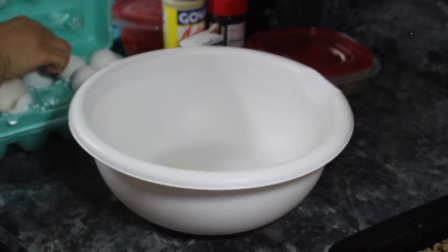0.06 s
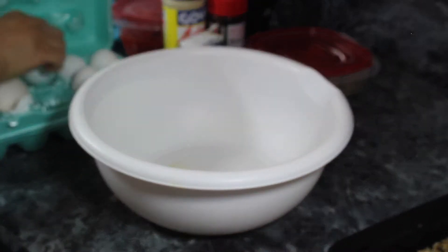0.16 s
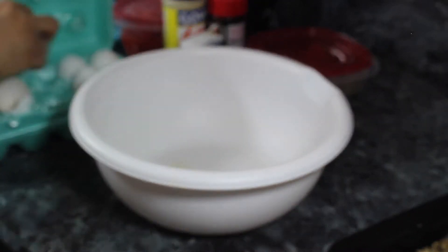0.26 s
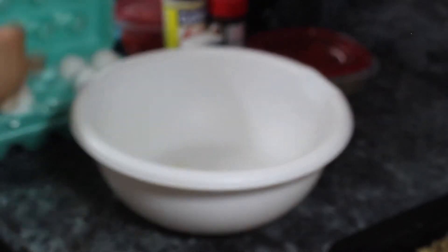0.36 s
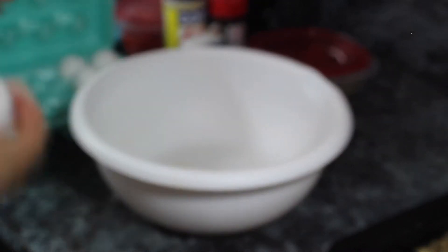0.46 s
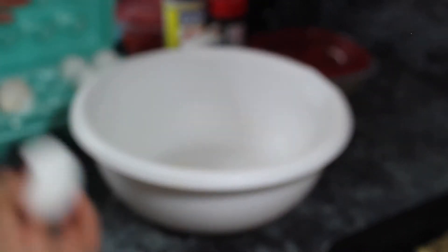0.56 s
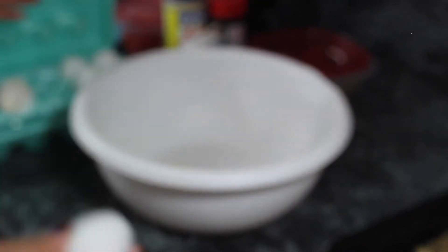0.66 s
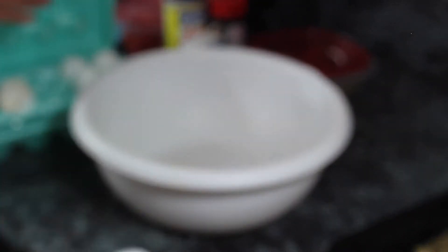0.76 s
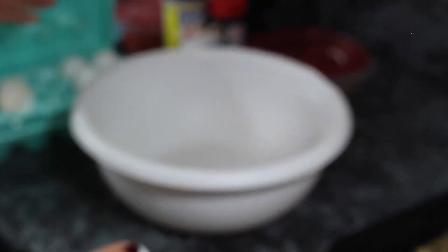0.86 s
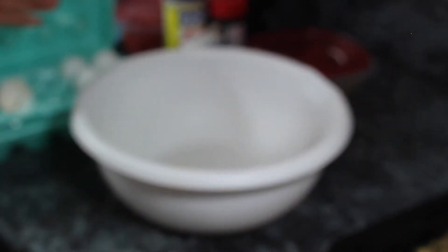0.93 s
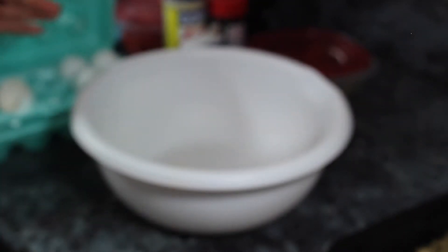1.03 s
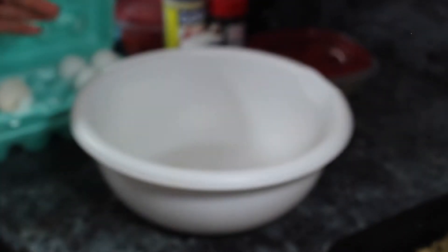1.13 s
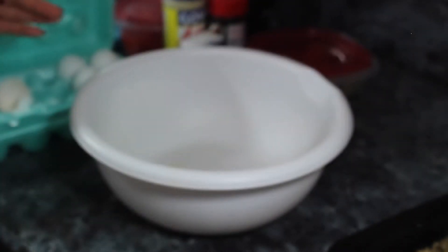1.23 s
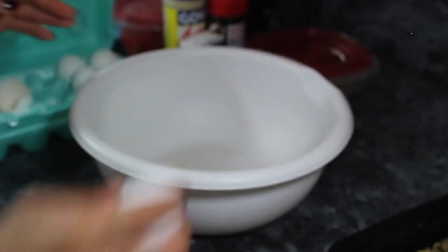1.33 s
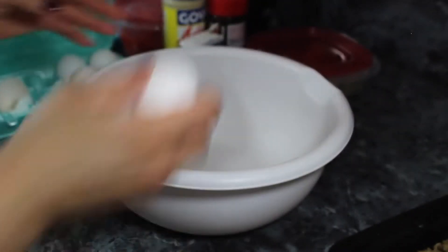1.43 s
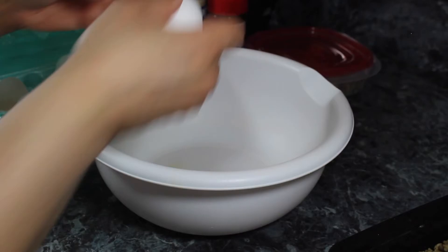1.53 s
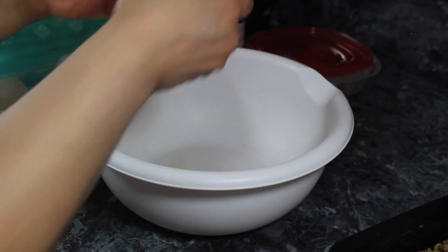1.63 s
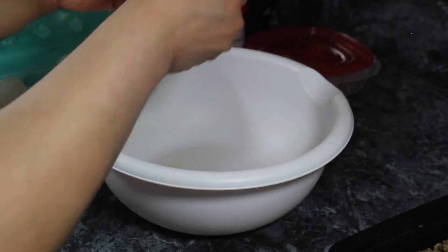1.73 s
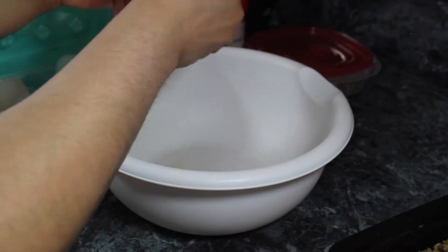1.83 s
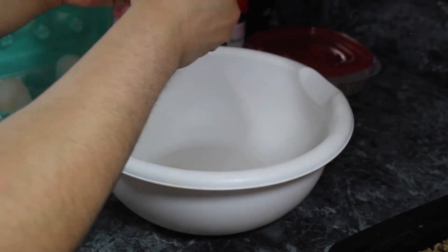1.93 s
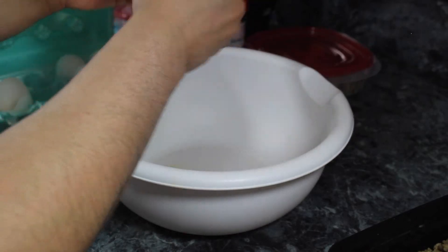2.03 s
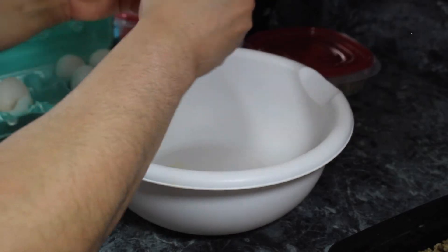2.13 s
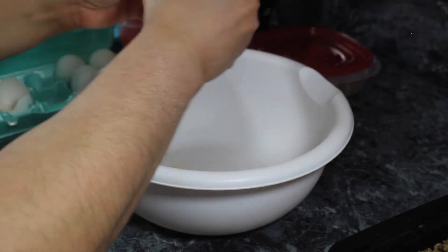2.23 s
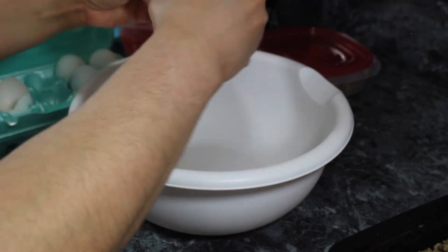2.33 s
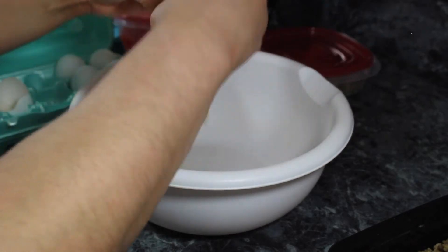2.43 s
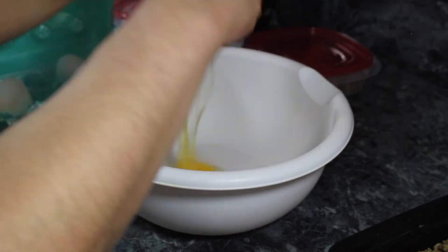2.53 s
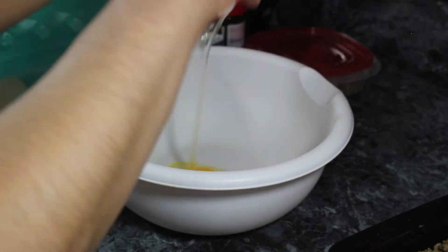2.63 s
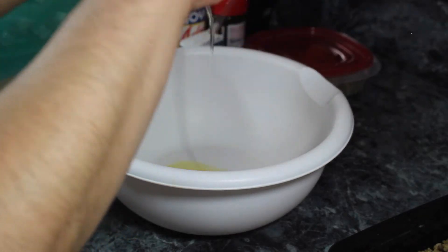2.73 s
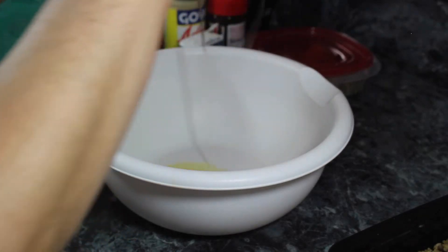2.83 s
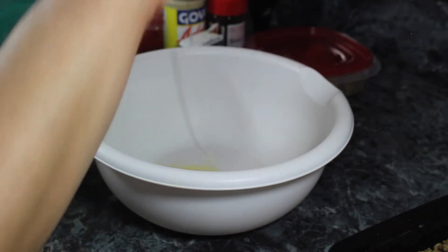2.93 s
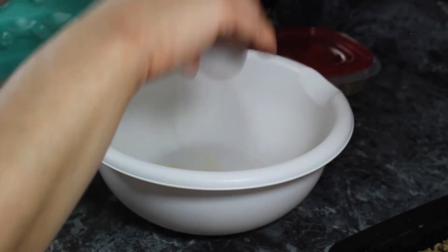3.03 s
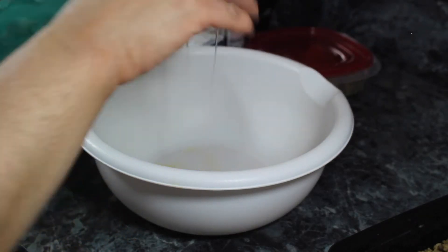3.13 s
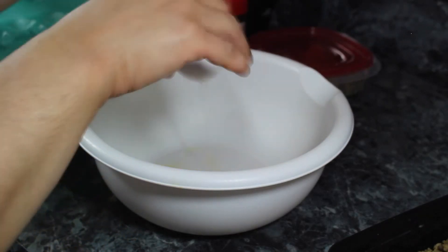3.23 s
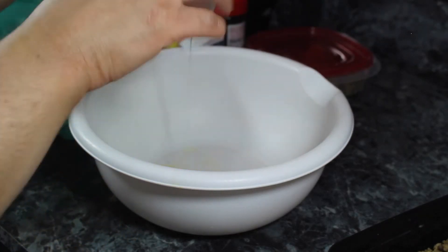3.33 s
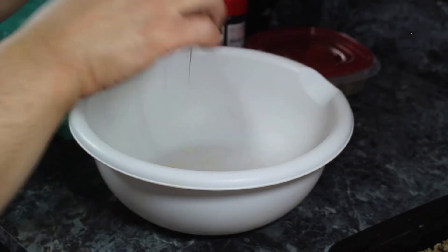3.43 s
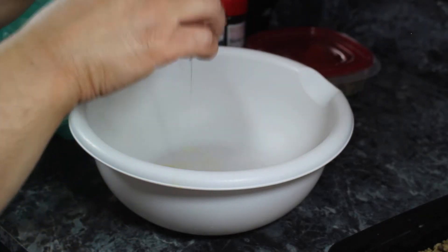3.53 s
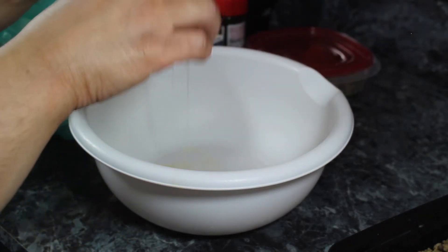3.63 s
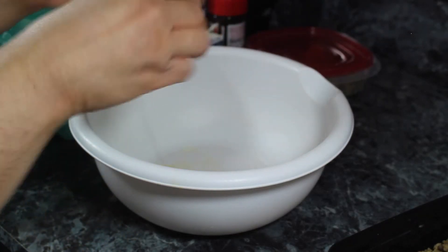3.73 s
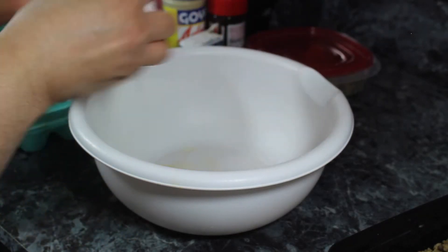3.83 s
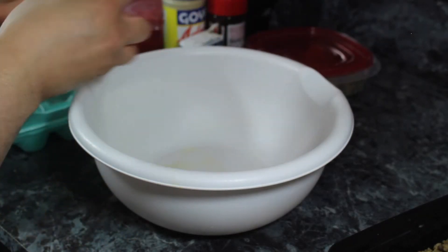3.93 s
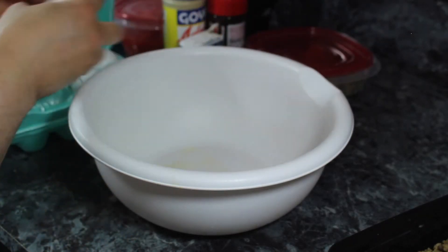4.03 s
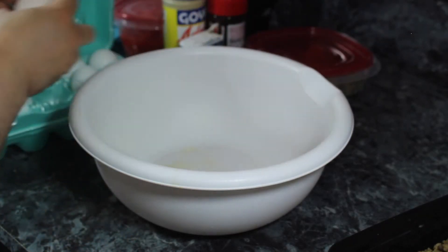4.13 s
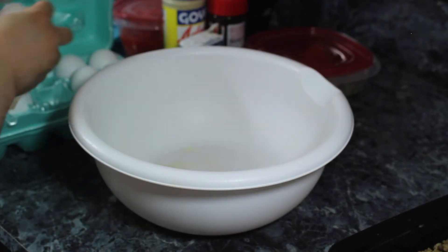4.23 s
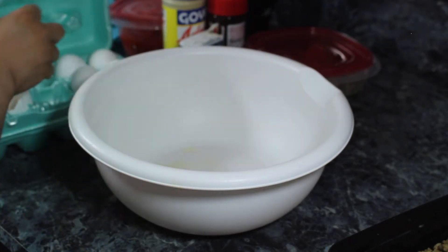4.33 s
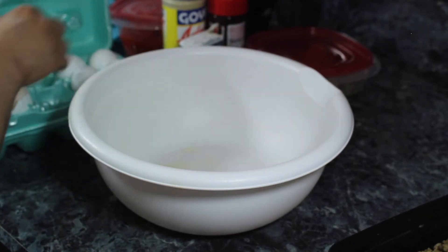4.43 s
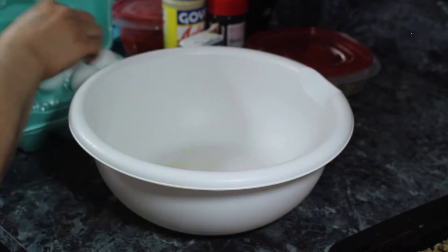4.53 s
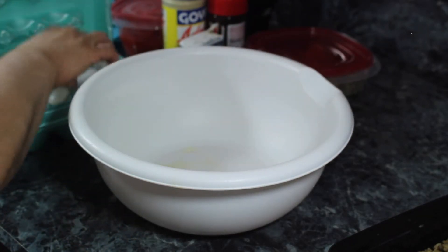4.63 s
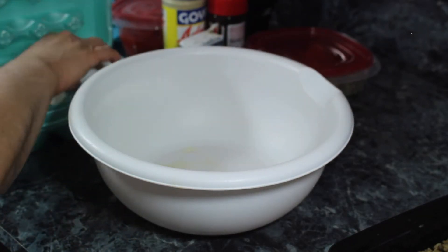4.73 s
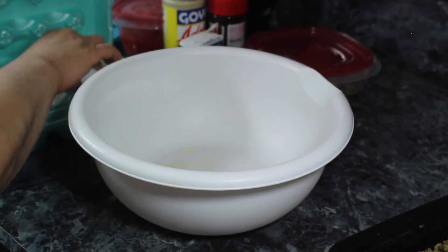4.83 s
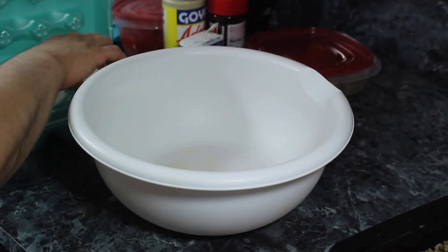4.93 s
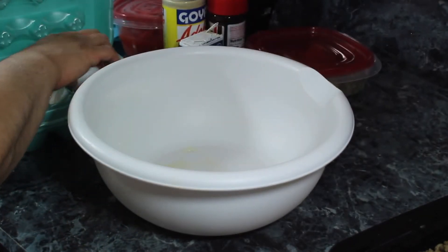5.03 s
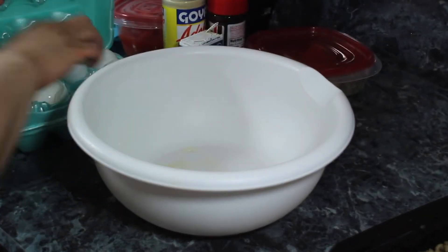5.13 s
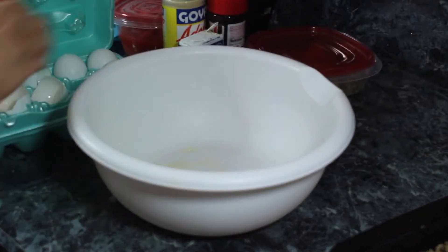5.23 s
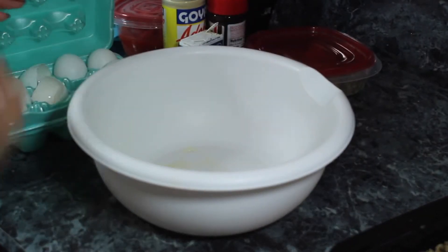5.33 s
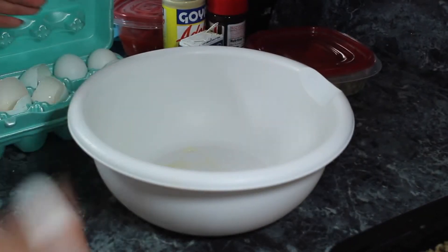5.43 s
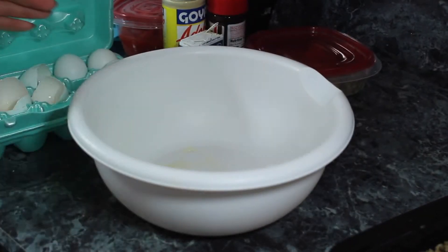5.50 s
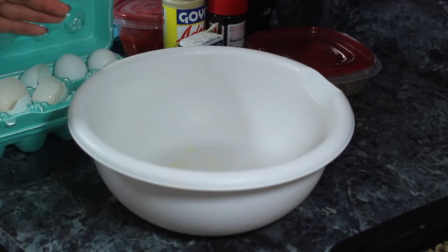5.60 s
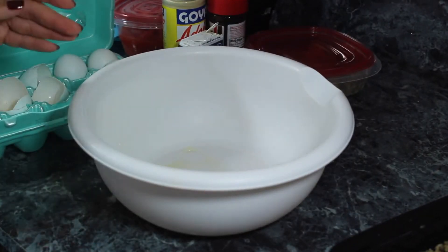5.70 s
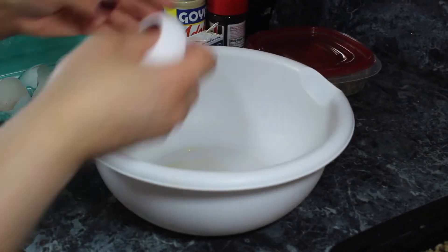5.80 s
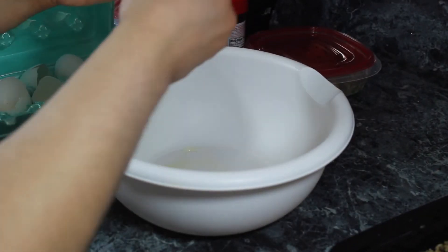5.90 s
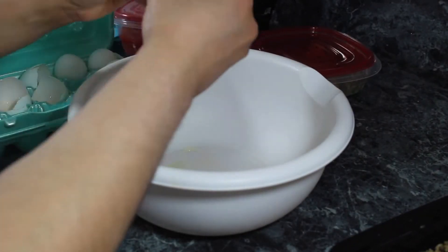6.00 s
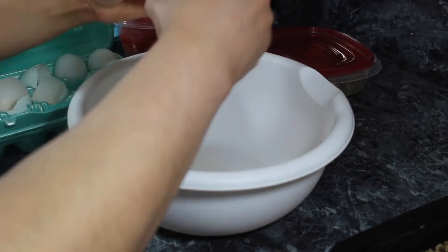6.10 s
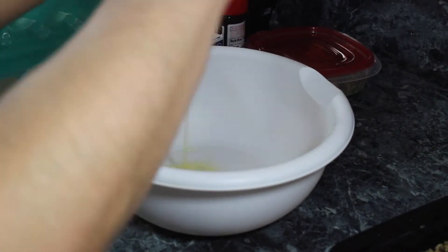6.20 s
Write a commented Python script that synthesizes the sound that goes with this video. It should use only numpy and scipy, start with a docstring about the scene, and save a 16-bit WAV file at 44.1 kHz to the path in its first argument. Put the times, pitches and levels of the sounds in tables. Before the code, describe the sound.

An egg is knocked twice on a stone counter, crackles open and drops wetly over a fridge hum; shells thump into a carton, then near silence.

```python
"""Cracking an egg in the kitchen

An egg is lifted from a foam carton, knocked twice on a stone counter and split over a plastic bowl;
the shells crackle back into the carton, which scrapes and bumps. Random runs of fractures and slips drive
the resonances of shell, counter, foam and carton; a hollow pop and wet drips slide in pitch, and noise
makes the echo. A fridge hums in steady tones over moving air until, near the end, the sound cuts
to a far quieter stretch of faint hiss and tiny shell ticks."""
import sys
import numpy as np
from scipy import signal
from scipy.fft import rfft, irfft, next_fast_len
from scipy.io import wavfile
from scipy.ndimage import uniform_filter1d

SR = 44100
rng = np.random.default_rng(int(sys.argv[2]) if len(sys.argv) > 2 else 0)


def bounce(signal):
    """Save signal as a 16-bit WAV file at the path given by the first command-line argument."""
    frames = np.transpose(np.atleast_2d(signal))
    limited = np.clip(frames, -1, 1)
    pcm = np.round(limited * 32767).astype(np.int16)
    wavfile.write(sys.argv[1], SR, pcm)


N = 276066

# panel resonances of the carton: (frequency [Hz], nominal width [Hz], level [dB]); each use widens them
CARTON_PANELS = [(183.4, 15.7, 3), (361.6, 38, 3.5), (550, 44, -1), (820, 36, -3.5), (1084, 24.6, -9.5),
                 (1392, 110, -2)]
# likeness of the left and right sound fields: (frequency [Hz], correlation [-1 to 1])
LIKENESS = [(60, 0.7), (180, 0.97), (550, 0.8), (1650, 0.32), (4970, -0.077), (15000, 0.064)]


def amp(db):
    """Level definition: the amplitude gain of a level in dB."""
    return 10 ** (np.asarray(db) / 20)


def evened(x):
    """Energy normalization: scales to rms 1."""
    return x / np.sqrt(np.mean(x ** 2) + 1e-20)


def peaked(x):
    """Peak normalization: scales to peak 1."""
    return x / (abs(x).max() + 1e-20)


def held(x):
    """Short-time energy normalization: scales to rms 1 over the loudest few milliseconds."""
    loudest_power = uniform_filter1d(x ** 2, size=256).max()
    return x / np.sqrt(loudest_power + 1e-20)


def read(points, hz):
    """Logarithmic frequency scale: interpolates a spectrum along it."""
    f, value = np.transpose(points)
    return np.interp(np.log(hz + 1), np.log(f + 1), value)


def add(mix, s, sound):
    """Superposition: mixes a sound in at s seconds."""
    part = mix[round(s * SR):][:len(sound)]
    part += sound[:len(part)]


def ring(x, hz, width):
    """Damped resonance: two poles whose radius sets the width in Hz."""
    r = np.exp(-np.pi * width / SR)
    return signal.lfilter([1 - r, 0, r - 1], [1, -2 * r * np.cos(2 * np.pi * hz / SR), r * r], x)


def band(x, lo_hz, hi_hz):
    """Band limitation: a gentle band-pass."""
    edges_hz = [lo_hz, min(hi_hz, 0.45 * SR)]
    return signal.sosfilt(signal.butter(2, edges_hz, "band", fs=SR, output="sos"), x)


def slips(count, spread_db):
    """Stick-slip and fracture statistics: tiny events of uneven size, a few large."""
    size_db = spread_db * np.minimum(rng.exponential(1, count), 4)
    return rng.standard_normal(count) * amp(size_db)


def burst(length_s, spread_db):
    """Impact excitation: a sudden run of slips that dies with the contact."""
    t = np.arange(SR // 4) / SR
    return slips(len(t), spread_db) * np.exp(-(t / max(length_s, 1e-3)) ** 2)


def clumps(count, depth_db):
    """Intermittency: slips come in clumps a few milliseconds long."""
    crowding = evened(uniform_filter1d(rng.standard_normal(count), size=250))
    return slips(count, 2.8) * amp(depth_db * crowding)


def paired_noise(frames, hz):
    """Partial coherence: random left and right spectra share part of their phase and size."""
    a, b, c, d = rng.standard_normal((frames, len(hz), 4)).T
    same = np.clip(read(LIKENESS, hz), -1, 1)[:, None]
    left = a + 1j * b
    right = same * left + np.sqrt(1 - same ** 2) * (c + 1j * d)
    return np.array([left, right])


def blow(db, thump_db, crunch_db, length_s, tilt_db, *settle):
    """Modal excitation: the knock rings egg and counter, high modes more in a harder blow; the shell crunches."""
    # modes of the egg: (frequency [Hz], level [dB], nominal decay time [s])
    egg_modes = [(668, 7.5, 0.014), (1170, 6.5, 0.015), (1378, 5, 0.018), (1660, -10, 0.037),
                 (1959, -2, 0.059), (2570, -6.5, 0.013), (3493, -7, 0.017)]
    # modes of the counter: (frequency [Hz], level [dB], nominal decay time [s])
    counter_modes = [(178, 1, 0.14), (241, 5.5, 0.14), (340, -24, 0.033)]
    drive = burst(length_s, 1.5)
    knock = sum(amp(d + tilt_db * np.log2(f / 1400)) * held(ring(drive, f, 2.3 / decay_s))
                for f, d, decay_s in egg_modes)
    thump = sum(amp(d) * held(ring(drive, f, 1.9 / decay_s)) for f, d, decay_s in counter_modes)
    sound = amp(db) * peaked(band(knock, 750, 3000))
    sound += amp(thump_db) * held(band(thump, 120, 440))
    sound += amp(crunch_db) * held(band(drive, 3000, 10000))
    return sound + settling(*settle)


def settling(db, fade_db_per_s, treble_db):
    """Fracture relaxation: small fractures of the dented shell go on crunching and fade."""
    t = np.arange(SR // 4) / SR
    drive = clumps(len(t), 2.3)
    layers = evened(band(drive, 630, 2600)) + amp(treble_db) * evened(band(drive, 2600, 7000))
    edges = np.clip(t / 0.015, 0, 1) * np.clip((0.25 - t) / 0.05, 0, 1)
    return amp(db - fade_db_per_s * t) * layers * edges


def crack(ratios, db, hz, low_db, upper_db, fizz_db, length_s):
    """Brittle fracture: a snap, then fractures ring the curved shell at three pitches and spray splinters."""
    shell_q = 12  # ring pitch over ring width
    snap_db = 11.5  # peak of the first snap over the splinters
    snap = burst(0.001, 2.0)
    drive = burst(length_s, 2.8) + 2.27 * snap
    rings = ((hz, 0), (ratios[0] * hz, low_db), (ratios[1] * hz, upper_db))
    shell = 0
    for f, d in rings:
        first_pass = ring(drive, f, f / shell_q)
        shell = shell + amp(db + d) * held(ring(first_pass, f, 0.75 * f))
    first_snap = amp(snap_db) * peaked(band(drive, 1890, 6400))
    splinters = held(band(drive, 3340, 12000))
    return shell + amp(fizz_db) * (first_snap + splinters)


def ticks():
    """Small-scale fracture: rows for tiny cracks that are nearly all splinters."""
    # tiny shell ticks: (time [s], splinters [dB])
    tick_rows = [(5.977, -83.5), (6.032, -87), (6.055, -81), (6.104, -78), (6.167, -74), (6.192, -81)]
    pitch_hz, ring_over_splinters_db, tearing_s = 2100, -19.5, 0.0055
    return [(s, db + ring_over_splinters_db, pitch_hz, -3, 3, db, tearing_s) for s, db in tick_rows]


def pocket(db, first_hz, last_hz, width_hz, length_s):
    """Cavity resonance: a pocket of air, hollow or wet, rings briefly while its pitch slides."""
    t = np.arange(SR // 4) / SR
    hz = last_hz + (first_hz - last_hz) * np.exp(-1.5 * t / length_s)
    r = np.exp(-np.pi * width_hz / SR)
    push = burst(length_s, 0.51) + 1j * burst(length_s, 0.83)
    waver = signal.lfilter([1], np.poly([r, r]), push)  # twice smoothed: no bright click
    carrier = np.exp(2j * np.pi * np.cumsum(hz) / SR)
    return amp(db) * held((waver * carrier).real)


def stroke(boom_db, hiss_db, rows):
    """Stick-slip friction: dense slips squeak on the foam, boom in the carton and hiss."""
    # squeak resonances of the foam: (frequency [Hz], width [Hz], level [dB])
    foam_modes = [(1600, 290, -4.5), (2010, 1300, 7.5), (2910, 1800, -2), (4200, 1900, -2)]
    s, pressure_db = np.transpose(rows)
    t = np.arange(s[0], s[-1], 1 / SR)
    drive = clumps(len(t), 1.92)
    squeak = band(sum(amp(d) * evened(ring(drive, f, w)) for f, w, d in foam_modes), 674, 4900)
    boom = sum(amp(d) * ring(slips(len(t), 3.9), f, 1.9 * w) for f, w, d in CARTON_PANELS)
    boom = band(boom, 150, 890)
    hiss = band(drive, 6800, 11500)
    layers = evened(squeak) + amp(boom_db) * evened(boom) + amp(hiss_db) * evened(hiss)
    edges = np.clip(np.minimum(t - s[0] + 0.0013, s[-1] - t) / 0.0026, 0, 1)
    return amp(np.interp(t, s, pressure_db)) * layers * edges


def bump(db, bright_db, length_s):
    """Damped panel vibration: a dull knock through the panels of the carton."""
    drive = burst(length_s, 4.7)
    panels = sum(amp(d) * held(ring(drive, f, 2.16 * w)) for f, w, d in CARTON_PANELS)
    brightness = held(band(drive, 3900, 10000))
    return amp(db) * peaked(band(panels, 210, 2850)) + amp(bright_db) * brightness


def thud(db):
    """Low-frequency resonance: a soft push rings the cabinet under the counter."""
    thud_hz, fade_s = 61.4, 0.017
    t = np.arange(SR // 4) / SR
    return amp(db) * peaked(t * np.exp(-t / fade_s) * np.sin(2 * np.pi * thud_hz * t))


def counter_top(x):
    """Early scattering: bowl and counter scatter the treble; what one side gains the other loses."""
    t = np.arange(600) / SR
    scatter = band(rng.standard_normal(600) * np.exp(-t / 0.0025), 3800, 20000)
    scatter /= np.linalg.norm(scatter)
    return np.outer([1, -1], signal.fftconvolve(x, scatter)[:N])


def kitchen(x):
    """Diffuse reverberation: energy lingers band by band and returns with random phases, alike in the bass."""
    # reverberation time of the kitchen: (frequency [Hz], t60 [s])
    decay_times = [(200, 0.34), (600, 0.37), (1500, 0.29), (3000, 0.26), (6000, 0.21), (12000, 0.23)]
    # colour of the echo: (frequency [Hz], level [dB])
    echo_colour = [(100, -11.5), (300, -2.5), (1000, 1), (4000, 1), (12000, 1)]
    hz, _, z = signal.stft(x, SR, nperseg=512, noverlap=384)
    power = uniform_filter1d(abs(z) ** 2, size=5, axis=0)
    # share of the energy kept from one frame to the next, 128 samples on
    keep = amp(-120 * 128 / SR / np.maximum(read(decay_times, hz), 0.05))
    power = np.array([signal.lfilter([1 - k], [1, -k], p) for k, p in zip(keep, power)])
    size = np.sqrt(abs(power)) * amp(read(echo_colour, hz))[:, None]
    z = size * paired_noise(power.shape[1], hz)
    tail = signal.istft(z, SR, nperseg=512, noverlap=384)[1]
    return np.pad(tail, ((0, 0), (330, 0)))[:, :N]  # the echo starts 330 samples late


def wash(spectrum, patchy_db):
    """Noise synthesis: random short-time spectra with drifting patches, partly alike left and right."""
    frames, hz = N // 512 + 5, np.fft.rfftfreq(2048, 1 / SR)
    patches = rng.standard_normal((len(hz), frames))
    patches = uniform_filter1d(patches, size=20, axis=0)  # along frequency
    patches = evened(uniform_filter1d(patches, size=6, axis=1))  # along time
    z = paired_noise(frames, hz) * amp(read(spectrum, hz)[:, None] + patchy_db * patches)
    return evened(signal.istft(z, nperseg=2048, noverlap=1536)[1][:, :N])


def fridge():
    """Beating of near tones: steady motor tones over moving air, ended by a cut."""
    # motor hum: (frequency [Hz], rms level [dB], time in step with the mains buzz [s]); near neighbours beat
    hum_tones = [(59.27, -59.7, 0), (77.94, -70.6, 0), (91.85, -71.4, 0), (113.66, -55.2, .0766),
                 (118.62, -54.5, .1325), (120, -48.8, 0), (194.36, -55, 0), (233.8, -62.3, 0),
                 (240.07, -60.4, 0)]
    # spectrum of the moving air: (frequency [Hz], relative level [dB])
    air_spectrum = [(15, -56.5), (25, -22.5), (59, -14), (84, -18.5), (99, -15), (120, -15), (137, 1),
                    (153, -31), (185, -10), (242, -6), (451, -13), (489, -11), (560, -14.5), (1160, -21),
                    (16000, -39)]
    air_db, mains_hz, cut_s = -45, 120, 5.654
    t = np.arange(N) / SR
    hum = 0
    for hz, db, crest_s in hum_tones:
        turns = mains_hz * t - (mains_hz - hz) * (t - crest_s)
        hum = hum + np.sqrt(2) * amp(db) * np.cos(2 * np.pi * turns)
    before_cut = np.clip((cut_s - t) / 0.0076 + 0.5, 0, 1) ** 2
    return (hum + amp(air_db) * wash(air_spectrum, patchy_db=2.3)) * before_cut


def faint_hiss():
    """Background noise floor: a hiss with faint tones that lasts throughout."""
    # spectrum of the hiss: (frequency [Hz], relative level [dB])
    hiss_spectrum = [(88, -59.5), (150, -30.5), (231, -14), (398, -24.5), (475, 1), (545, -25.5), (774, -9),
                     (837, -7), (16000, -35.5)]
    # tones under the hiss: (frequency [Hz], rms level [dB])
    faint_tones = [(236.9, -102), (479.1, -91.5), (775.2, -95.5), (958.2, -103)]
    hiss_db = -85.5
    t = np.arange(N) / SR
    tones = sum(np.sqrt(2) * amp(db) * np.sin(2 * np.pi * hz * t) for hz, db in faint_tones)
    return tones + amp(hiss_db) * wash(hiss_spectrum, patchy_db=1.5)


def scene():
    """Superposition of sources: hands at work close by, their echo, the fridge and the faint hiss."""
    # blows of the egg on the counter: (time [s], knock peak [dB], thump [dB], crunch [dB], contact time [s],
    # hardness [dB per octave], settling level [dB], settling fade [dB per s], settling treble [dB])
    blow_rows = [(1.0215, -0.5, -28, -14.5, 0.0093, -4.5, -27.5, 94.5, -9.5),
                 (1.1975, -9, -19.5, -17, 0.013, 17, -32.5, 397, 11)]
    # shell cracks: (time [s], ring [dB], shell pitch [Hz], low ring over it [dB], upper ring over it [dB],
    # splinters [dB], tearing time [s])
    crack_rows = [(2.025, -51.5, 2300, -2, -18, -50, 0.014), (2.038, -58.5, 2300, -5, -17, -43.5, 0.017),
                  (2.066, -53, 2080, 9, -13, -41, 0.038), (2.135, -50.5, 2070, 6.5, -16, -45, 0.02),
                  (2.197, -33, 2530, -10, -7, -35.5, 0.018), (2.219, -24, 2410, -32, -3, -31, 0.0089),
                  (2.229, -20.5, 2620, -10, -33, -27, 0.018), (2.242, -41, 2490, -16, -5, -28, 0.0099),
                  (2.258, -37, 2530, -14, -8, -38, 0.048), (2.322, -43.5, 2450, -13, 7, -45, 0.018),
                  (2.345, -42, 2400, -15, -13, -47, 0.024), (2.373, -18.5, 2187, -44, -4.5, -29, 0.018),
                  (2.503, -60.5, 2280, 16, -7, -54.5, 0.032), (2.607, -46, 2850, 11, -9, -44.5, 0.023),
                  (2.635, -42, 2900, 8.5, -19, -45, 0.022), (2.658, -69, 2930, 2, -12, -47.5, 0.026),
                  (3.763, -54.5, 2950, 4, -18, -48.5, .022), (3.911, -32.5, 2980, 0, -1, -30.5, 0.042),
                  (3.935, -21, 3150, -6, -16, -35, 0.02), (4.076, -32.5, 2800, -11, -8, -55, 0.02),
                  (4.095, -31, 3030, -14, -5, -39, 0.021), (4.132, -53.5, 3160, 4.5, -12, -47, 0.024),
                  (4.293, -38.5, 2440, -11.5, -17, -40.5, 0.011), (4.376, -54, 2860, -4, -21, -41.5, 0.019),
                  (5.687, -76, 2750, -2, -23, -56, 0.0038), (6.131, -91, 3200, 0.5, 23.5, -79, 0.017)]
    # low and upper ring of the full and the empty shell: (low pitch, upper pitch) [ratio to shell pitch]
    full_rings = (0.62, 1.586)
    empty_rings = (0.523, 1.94)
    # hollow pop of the opening egg, then wet sounds of yolk and white:
    # (time [s], level [dB], first pitch [Hz], last pitch [Hz], width [Hz], length [s])
    pocket_rows = [(2.373, -29, 920, 944, 61.3, 0.017), (2.546, -37, 1550, 1460, 250, 0.0036),
                   (2.5535, -28.5, 1918, 378, 1030, 0.016), (2.554, -34.5, 452, 302, 400, 0.013),
                   (2.7305, -38.5, 2660, 3130, 400, 0.017), (2.7305, -41.5, 5140, 5160, 900, 0.018),
                   (2.733, -43.5, 7200, 7450, 4020, 0.012), (3.217, -49, 4250, 4420, 300, 0.011),
                   (3.217, -52, 3480, 3530, 350, 0.014)]
    # rubbing on the carton: (boom [dB], hiss [dB], pressure as rows of (time [s], squeak [dB]))
    stroke_rows = [(-11, -10, [(0.0, -35.5), (.03, -27.5), (.086, -50), (.148, -41), (.182, -62),
                   (.268, -66), (.302, -47.5), (.374, -58), (.5, -64)]), (4, -6, [(3.4, -67), (3.422, -57),
                   (3.45, -73), (3.534, -52.5), (3.6, -87)]), (1.5, -10, [(4.24, -46), (4.25, -37.5),
                   (4.298, -41), (4.312, -60), (4.35, -67)]), (-3.5, -12, [(4.462, -24), (4.475, -61),
                   (4.522, -43), (4.544, -20.5), (4.565, -32.5), (4.676, -32.5), (4.692, -28.5),
                   (4.708, -39), (4.844, -43), (4.906, -51)]), (-15, -11, [(4.92, -56), (4.95, -37.5),
                   (4.986, -43), (5.028, -24.5), (5.078, -46.5), (5.142, -64), (5.172, -49.5),
                   (5.194, -58.5), (5.45, -61)])]
    # bumps of the carton: (time [s], peak [dB], brightness [dB], contact time [s])
    bump_rows = [(.024, -52, -38, 0.029), (4.247, -39, -64, .0023), (4.276, -48, -39, .0041),
                 (4.442, -7, -30, 0.01), (4.449, -3.5, -23.5, 0.007), (4.473, -7, -51, 0.0057),
                 (4.492, -21.5, -58, .025), (4.52, -20.5, -54, .012), (4.533, -10, -47, 0.016),
                 (4.541, -40, -34, 0.0042), (4.566, -20, -36, 0.0087), (4.596, -29, -35.5, 0.0046),
                 (4.633, -19, -47, .012), (4.655, -16.5, -40, 0.017), (4.687, -26.5, -54, 0.0053),
                 (4.74, -28, -51, 0.012), (4.778, -28.5, -54, 0.021), (4.83, -43, -45, 0.0095),
                 (4.945, -28.5, -52, 0.018)]
    # weight shifting on the counter, felt as a deep thud: (time [s], peak [dB])
    thud_rows = [(0.06, -38), (1.041, -39.5), (1.199, -52.5), (2.555, -45), (4.56, -40.5), (4.779, -45.5),
                 (5.07, -45)]
    open_s = 2.55  # the egg has dropped: from here the halves ring empty
    scatter_db, echo_db = -6.5, -5
    near, deep = np.zeros(N), np.zeros(N)
    for table, source in ((blow_rows, blow), (bump_rows, bump), (pocket_rows, pocket)):
        for s, *row in table:
            add(near, s, source(*row))
    for s, *row in crack_rows + ticks():
        ratios = full_rings if s < open_s else empty_rings
        add(near, s, crack(ratios, *row))
    for boom_db, hiss_db, rows in stroke_rows:
        add(near, rows[0][0], stroke(boom_db, hiss_db, rows))
    for s, db in thud_rows:
        add(deep, s, thud(db))
    hands = near + amp(scatter_db) * counter_top(near) + amp(echo_db) * kitchen(near) + deep
    return hands + fridge() + faint_hiss()


def record(dry):
    """Transducer response: microphones dull the top and differ in colour; overload clips; then the band limit."""
    # response of the microphones: (frequency [Hz], level [dB])
    microphone = [(1000, 0), (2200, -1.5), (3200, -1.5), (5000, -1.5), (8000, -3), (12000, -6.5),
                  (16000, -4.5)]
    # difference of the two channels: (frequency [Hz], left over right [dB])
    lean = [(60, -0.5), (240, -1.5), (950, -1.5), (3770, 1.5), (15000, 1)]
    edge_hz = 16000
    size = next_fast_len(N + 4096)
    hz = np.fft.rfftfreq(size, 1 / SR)
    colour = amp(read(microphone, hz) + np.outer([0.5, -0.5], read(lean, hz)))
    heard = irfft(rfft(dry, size) * colour, size)[:, :N]
    clipped = np.clip(heard, -1, 1)
    low_pass = signal.firwin(511, edge_hz, window=("kaiser", 9), fs=SR)
    return signal.oaconvolve(clipped, low_pass[None], "same")


dry = scene()
out = record(dry)
bounce(out)
```